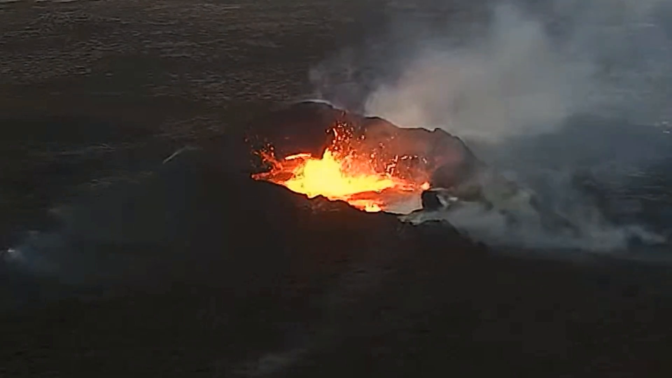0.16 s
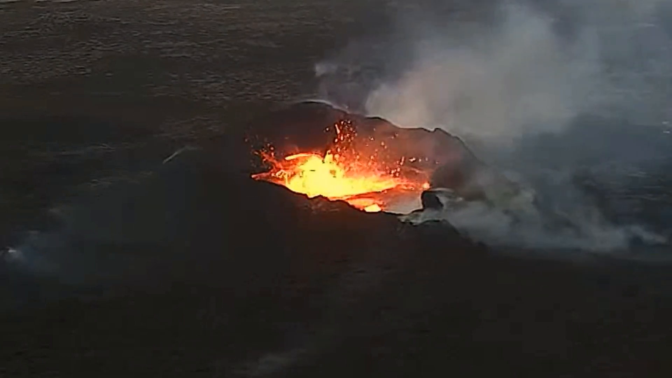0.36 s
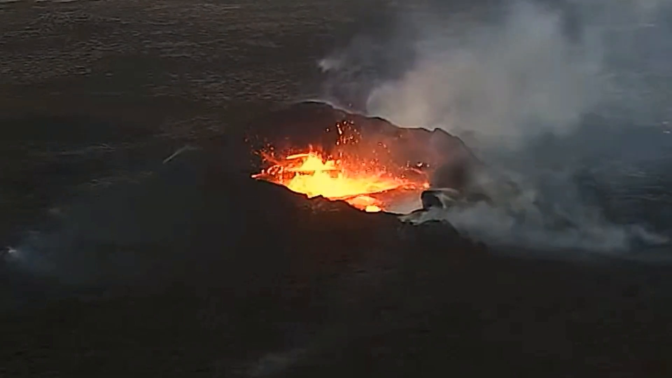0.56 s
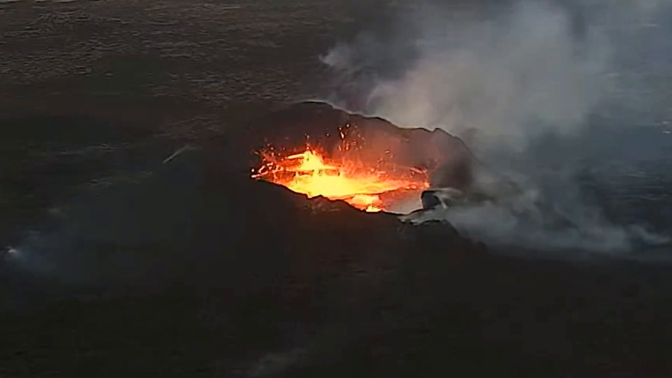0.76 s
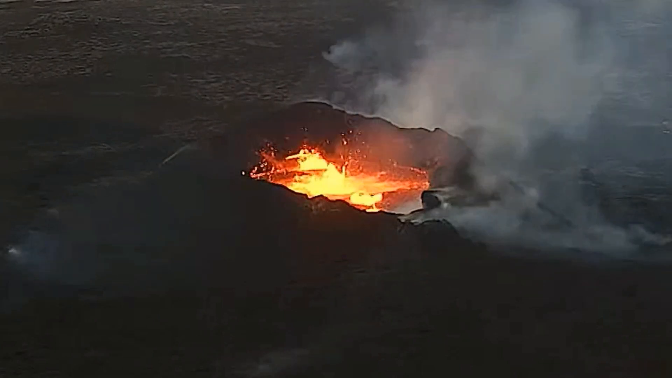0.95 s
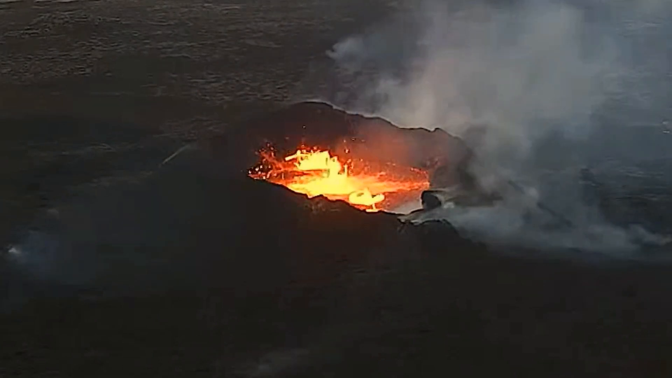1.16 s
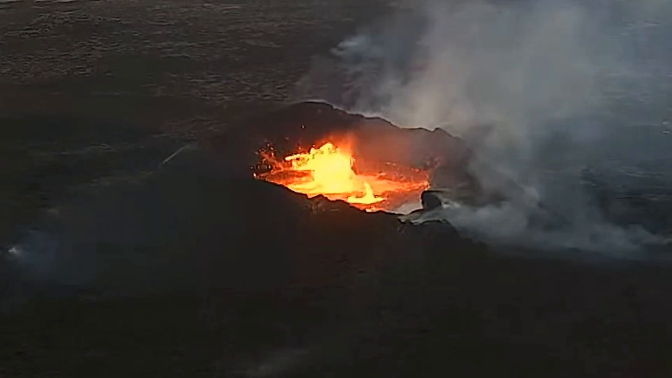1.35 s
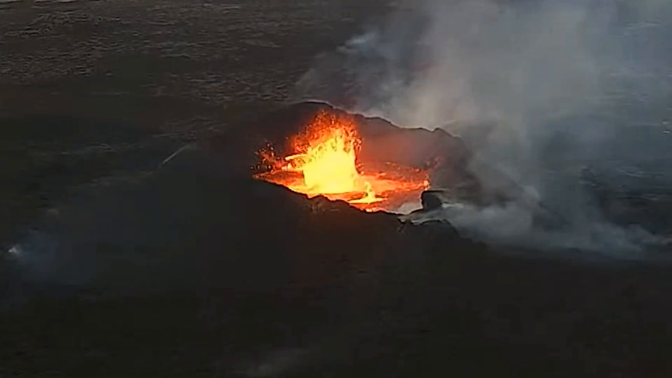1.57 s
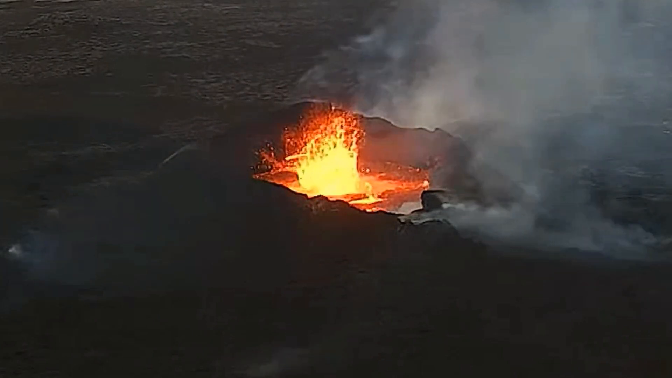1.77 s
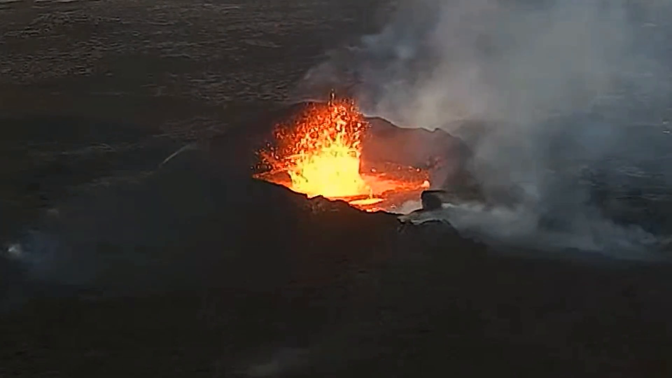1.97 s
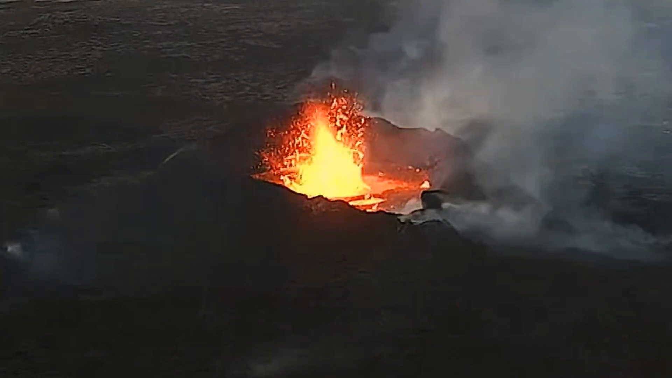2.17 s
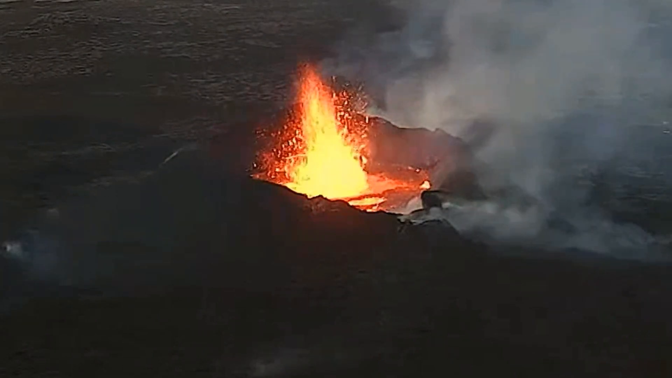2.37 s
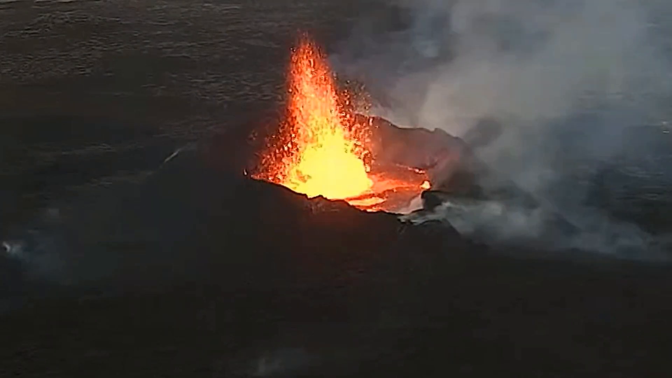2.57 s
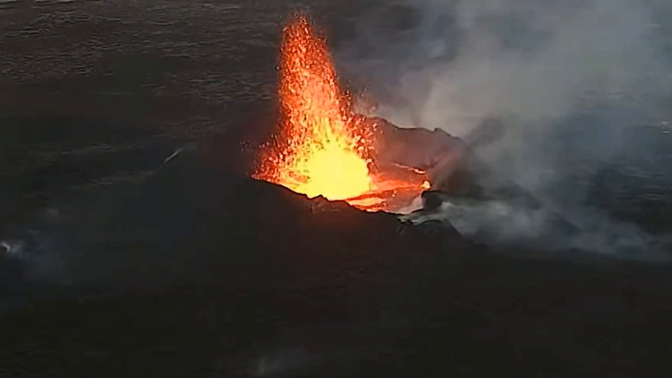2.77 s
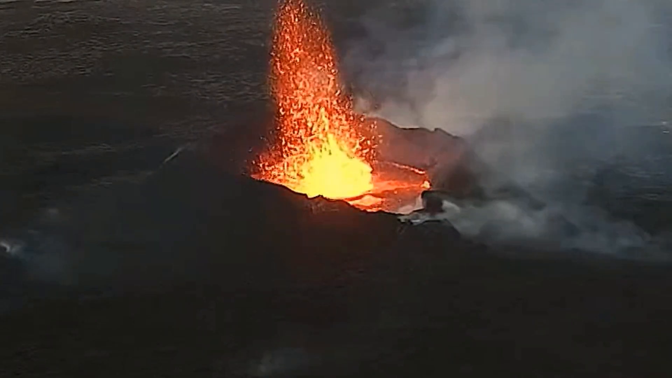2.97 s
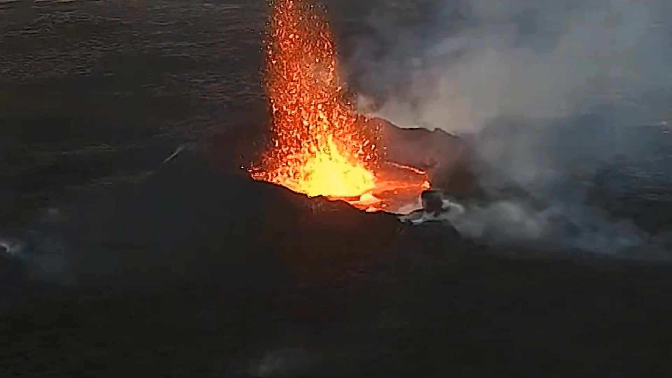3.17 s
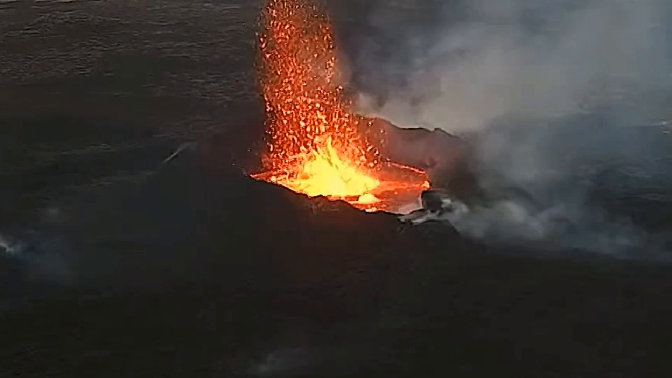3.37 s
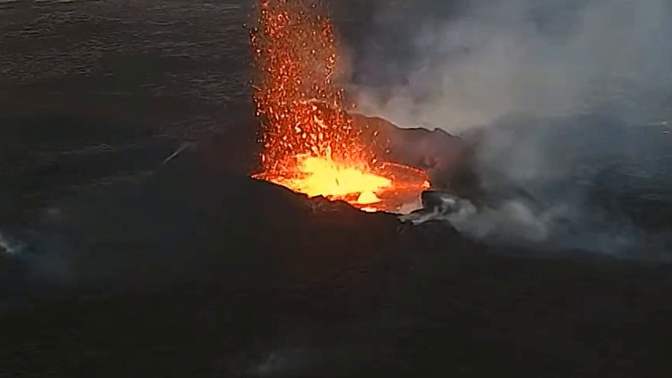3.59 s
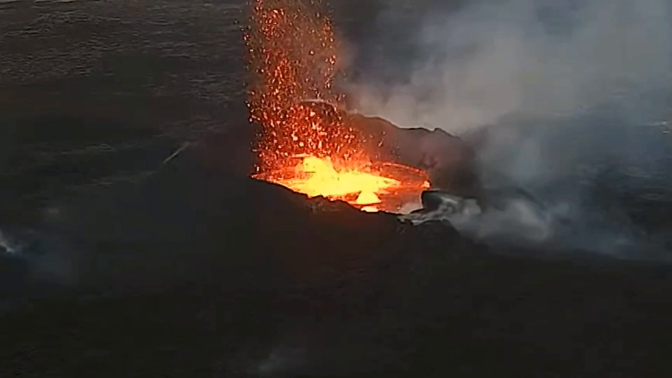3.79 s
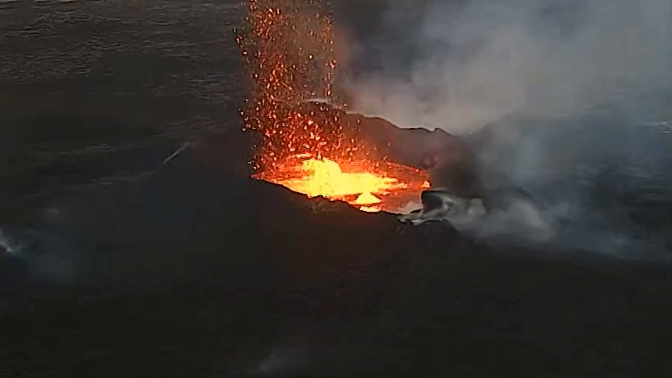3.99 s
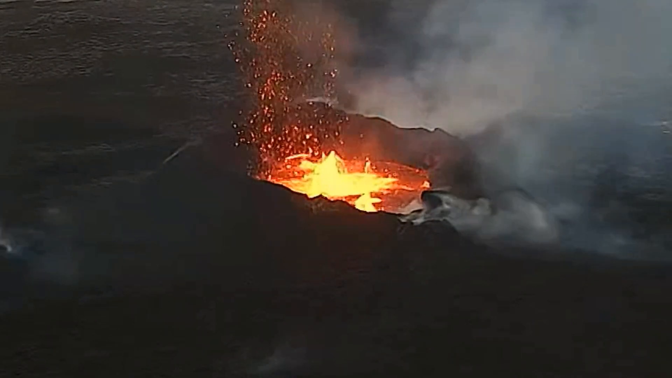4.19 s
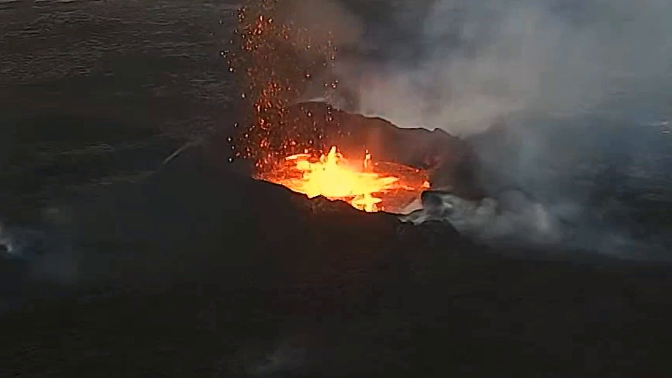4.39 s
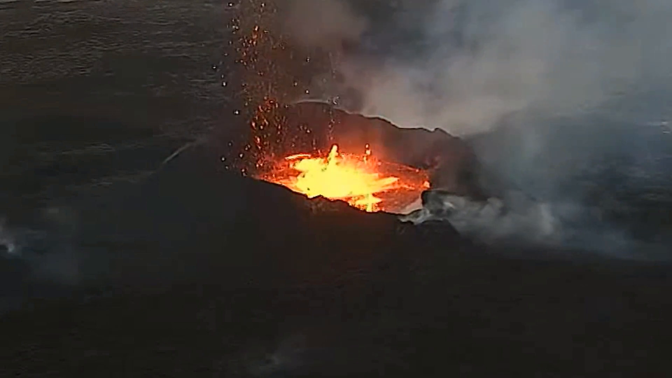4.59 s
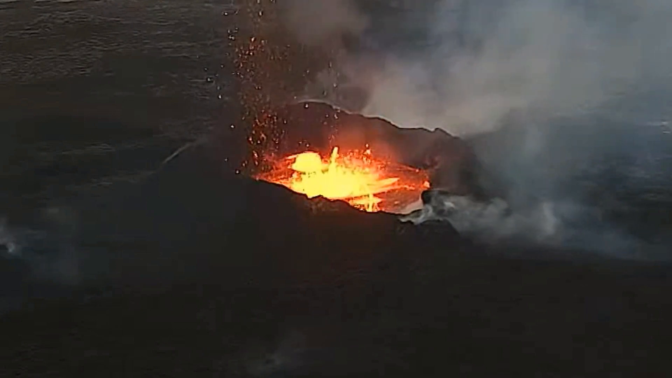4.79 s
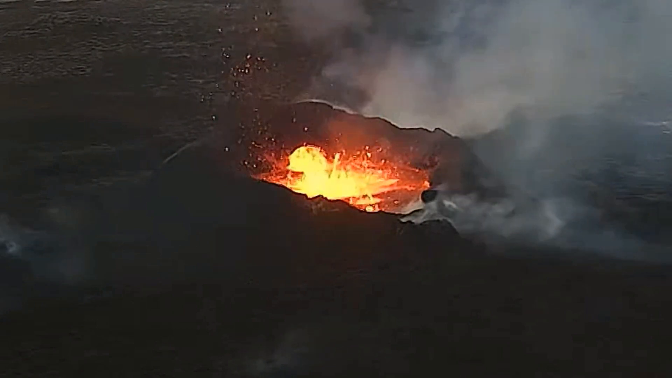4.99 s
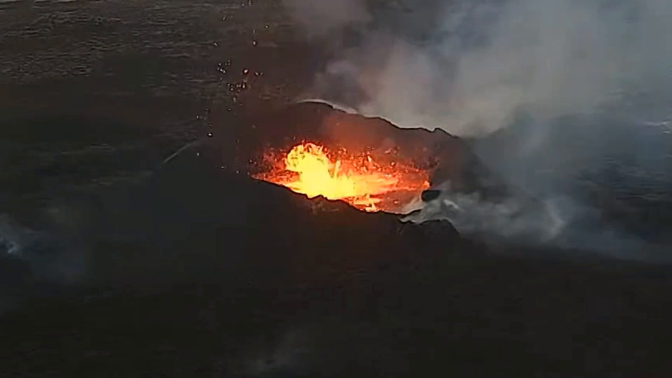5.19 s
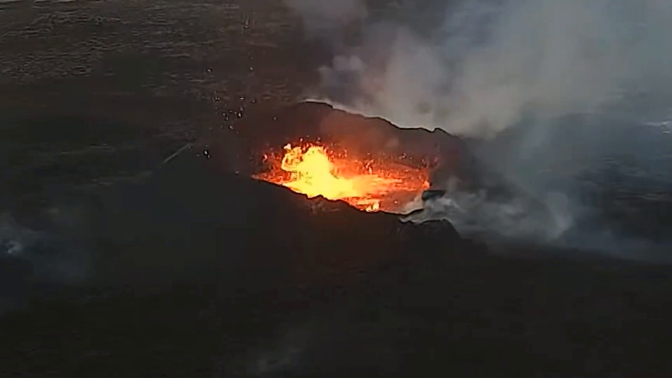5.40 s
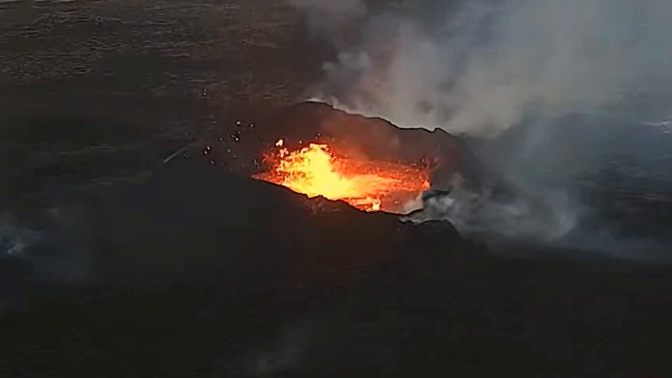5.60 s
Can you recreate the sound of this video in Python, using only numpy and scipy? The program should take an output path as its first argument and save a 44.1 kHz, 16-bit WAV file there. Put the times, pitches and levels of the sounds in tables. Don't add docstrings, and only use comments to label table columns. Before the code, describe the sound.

Outdoors, far from a lava crater: a dull churning roar and deep rumble run throughout. A breathy, fluttering whistle on the left and a lower howl sound in the first second. Around two seconds a fountain blows out with a bright, smooth gas rush while booming bubble bursts thicken. A weaker whistle and higher howl return after three seconds, echoing on the right. Heavy rumbling continues to the end. Wide, distant stereo microphone.

```python
import sys
import numpy as np
from scipy import signal
from scipy.fft import rfft, irfft, next_fast_len
from scipy.io import wavfile
from scipy.ndimage import uniform_filter1d

SR = 44100
rng = np.random.default_rng(int(sys.argv[2]) if len(sys.argv) > 2 else 0)


def unload_audio(sound):
    columns = np.transpose(np.atleast_2d(sound))
    steps = np.round(np.clip(columns, -1, 1) * 32767)
    wavfile.write(sys.argv[1], SR, steps.astype(np.int16))


def level_to_linear(level):
    exponent = np.asarray(level, float) / 20
    return 10 ** exponent


N = 249165


def lean(left_db):
    return level_to_linear(left_db / 2 * np.array([[1], [-1]]))


def rms_one(x):
    return x / np.sqrt(np.mean(x ** 2) + 1e-20)


def at_hz(points, hz):
    table_hz, value = np.transpose(points)
    return np.interp(np.log(hz), np.log(table_hz), value)


def drift(rate_hz):
    coarse = 40
    r = np.exp(-2 * np.pi * rate_hz * coarse / SR)
    steps = rng.standard_normal(N // coarse + 2002)
    slow = signal.lfilter([1], [1, -2 * r, r * r], steps)[2000:]
    return np.interp(np.arange(N) / coarse, np.arange(len(slow)), rms_one(slow))


def turbulence(colour, band_hz, left=((1, 0), (2, 0))):
    size = next_fast_len(N)
    hz = np.arange(size // 2 + 1) * SR / size + 1e-3
    inside = (hz > colour[0][0]) & (hz < colour[-1][0])
    shape = level_to_linear(at_hz(colour, hz)) * lean(at_hz(left, hz)) * inside
    counted = (hz > band_hz[0]) & (hz < band_hz[1])
    power = 2 * np.sum(np.mean(shape ** 2, axis=0)[counted]) / size
    white = rng.standard_normal((2, size))
    return irfft(rfft(white) * shape, size)[:, :N] / np.sqrt(power)


def evened(x, over_s, share):
    width = round(over_s * SR)
    power = uniform_filter1d(uniform_filter1d(x ** 2, width), width)
    return rms_one(x / (power + 1e-9) ** (share / 2)) * np.sqrt(np.mean(x ** 2))


def tilted(x, tilt_db, low_hz, high_hz):
    low = signal.sosfiltfilt(signal.butter(2, low_hz, fs=SR, output="sos"), x)
    high = signal.sosfiltfilt(signal.butter(2, high_hz, "high", fs=SR, output="sos"), x)
    high_gain = level_to_linear(tilt_db * np.array([[1.3], [.7]]))
    return x - low - high + level_to_linear(-tilt_db) * low + high_gain * high


def blow(puffs):
    shape = (0, 6), (0.71, 0), (1, 6)     # (share of the puff, dB below its peak)
    return [(s + at * length, hz + (at - .5) * glide, db - down)
            for s, length, hz, glide, db in puffs for at, down in shape]


def whistle(rows, width_hz, flutter, alike, left_db, skirt_hz, skirt_db):
    s, hz, level_db = np.transpose(rows)
    start, stop = round(s[0] * SR), round(s[-1] * SR)
    t = np.arange(start, stop) / SR
    pitch = uniform_filter1d(np.interp(t, s, hz), round(.012 * SR))
    tone_db = uniform_filter1d(np.interp(t, s, level_db), round(.012 * SR))

    parts = []     # (width Hz, centre Hz, level dB)
    for side, down_db in ((-1.6, 6), (.3, 1.5)):
        strand_hz = pitch * (1 + flutter * (side + .3 * drift(12)[:len(t)]))
        parts.append((width_hz, strand_hz, tone_db - down_db + 2.2 * drift(22)[:len(t)]))
    rush_db = uniform_filter1d(tone_db, round(.12 * SR)) + skirt_db
    parts.append((skirt_hz, pitch - .55 * skirt_hz, rush_db))

    out = np.zeros((2, N))
    fade = signal.windows.tukey(len(t), .1)
    for wide_hz, centre_hz, db in parts:
        white = rng.standard_normal((3, 2 * SR)) + 1j * rng.standard_normal((3, 2 * SR))
        low_pass = signal.butter(3, wide_hz / 2, fs=SR, output="sos")
        slow = signal.sosfilt(low_pass, white)[:, -len(t):]
        slow = slow / np.sqrt(np.mean(np.abs(slow) ** 2))
        ears = np.sqrt(alike) * slow[0] + np.sqrt(1 - alike) * slow[1:]
        carrier = np.exp(2j * np.pi * np.cumsum(centre_hz) / SR)
        out[:, start:stop] += level_to_linear(db) * np.sqrt(2) * (ears * carrier).real * fade
    return out * lean(left_db)


# (time [s], length [s], pitch [Hz], glide [Hz], level [dB])
HIGH_PUFFS = [
    [(0.0, 0.097, 1511, -15, -53), (.11, .14, 1629, 194, -49.5), (.255, .04, 1330, 103, -47),
     (.295, .085, 1723, 396, -45), (.38, 0.03, 1760, -40.5, -50), (.41, .055, 1754, 80, -44.5),
     (.465, 0.061, 1880, 59, -47.5), (.53, .07, 1627, -350, -46.5), (.62, .1, 1590, 147, -49),
     (.72, .08, 1700, 9, -49), (.82, 0.056, 1355, 23, -46), (.88, .035, 1380, -3, -50.5),
     (.915, .055, 1372, -38, -40)],
    [(3.18, 0.0698, 1795, 102.5, -55), (3.25, 0.0712, 2055, 347, -57.5), (3.325, .05, 1722, 120.5, -58),
     (3.375, 0.039, 2252, 264, -53), (3.415, 0.06, 2174, 120, -51), (3.48, .055, 2394, 59, -55.5),
     (3.535, .075, 2080, -250, -55), (3.62, .09, 2020, 41.5, -57.5), (3.71, 0.0493, 2108, 29, -59),
     (3.765, .05, 1708, -60, -57.5), (3.815, .07, 1664, 32, -58), (3.9, .18, 1760, -61, -64)],
    [(4.24, 0.1, 1497, -50, -58.5), (4.345, .115, 1450, -120, -56.5)],
]


def vent_whistle():
    return sum(whistle(blow(puffs), width_hz=123, flutter=.04, alike=.35, left_db=left_db,
                       skirt_hz=900, skirt_db=3.5)
               for puffs, left_db in zip(HIGH_PUFFS, (8, 7.5, 7.0)))


# (time [s], length [s], pitch [Hz], glide [Hz], level [dB])
LOW_PUFFS = [
    [(.45, .2, 709, 11, -47.5), (.66, 0.119, 752.5, 8, -46), (.79, 0.0697, 700, 0, -52),
     (.87, 0.12, 729, -20.5, -38.5), (.99, 0.078, 720, 21, -44), (1.08, 0.085, 742, -3, -40.5)],
    [(3.33, 0.22, 900, -27.5, -54.5), (3.66, 0.11, 930, 124, -44), (3.77, .08, 1020, 39.5, -48),
     (3.85, .08, 1070, -3.5, -44.5), (3.93, .075, 1010, -80, -44), (4.01, 0.0604, 920, 0, -47),
     (4.075, .07, 990, -110, -42.5), (4.16, 0.15, 845, -170, -45)],
]


def vent_howl():
    return sum(whistle(blow(puffs), width_hz=67, flutter=.035, alike=.096, left_db=left_db,
                       skirt_hz=311.5, skirt_db=-1.0)
               for puffs, left_db in zip(LOW_PUFFS, (0, 6.5)))


# (time [s], length [s], pitch [Hz], glide [Hz], level [dB])
WALL_PUFFS = [(3.44, .18, 900, 35.5, -52), (3.63, .115, 1055, -17.5, -44.5), (3.745, .1, 979, -32.5, -47),
              (3.91, .09, 990, -71, -41), (4.01, .05, 900, -1, -42), (4.09, .09, 962, -100, -49),
              (4.18, .1, 831, -120, -49)]


def wall_echo():
    return whistle(blow(WALL_PUFFS), width_hz=66, flutter=.02, alike=.07, left_db=-7.5,
                   skirt_hz=303.4, skirt_db=-1.5)


# (time [s], level [dB])
FOUNTAIN = [(0, -92.5), (1.0, -96), (1.27, -76), (1.6, -70), (1.9, -65), (2.15, -67), (2.4, -68),
            (2.7, -71), (3.0, -72), (3.4, -78), (4.1, -82.5), (5.65, -100)]
# (frequency [Hz], level [dB per Hz])
JET_COLOUR = [(200, 34.5), (300, 28), (600, 29.5), (1250, 20.5), (2000, 12), (2800, 11.5), (3600, 7),
              (4400, -0.5), (5300, 0), (6200, -11), (7400, -10), (8200, -21.5), (8700, -30), (9000, -46)]
# (frequency [Hz], left minus right [dB])
JET_LEFT = [(200, 0.5), (600, 8.5), (1400, 8.5), (2300, 5), (4000, 4), (8000, 0)]


def fountain():
    jet_db = np.interp(np.arange(N) / SR, *np.transpose(FOUNTAIN)) + 3
    return level_to_linear(jet_db + .6 * drift(8.3)) * turbulence(JET_COLOUR, (4300, 8000), JET_LEFT)


# (time [s], vigour [dB], depth of the gas source [dB])
VIGOUR = [(0, -39.5, 3), (.4, -39, -2), (1.1, -40.5, -4.5), (1.75, -37.5, -6.5), (1.92, -36, -3),
          (2.4, -35, 3), (2.9, -33.5, 2.5), (3.5, -33.5, 1.5), (3.95, -31, -2), (4.4, -34.5, -1),
          (5.0, -32, -10), (5.65, -35.5, -6)]


def eruption():
    t = np.arange(N) / SR
    s, vigour_db, depth_db = np.transpose(VIGOUR)
    full_db = -33
    return np.interp(t, s, vigour_db - full_db), np.interp(t, s, depth_db)


def layer_db(offset_db, by_vigour, by_depth):
    vigour, depth = eruption()
    return offset_db + 4.0 + by_vigour * vigour + by_depth * depth


# (frequency [Hz], level [dB per Hz])
ROAR_COLOUR = [(100, -5), (200, -1.5), (300, -3.5), (600, -8), (900, -12), (1250, -19.5), (2000, -30),
               (2400, -34), (3200, -37), (4400, -56.5), (5400, -60), (6200, -73), (7400, -76),
               (8600, -90.5)]
# (time [s], level [dB], brightness [dB], left minus right [dB])
HEAVE = [(0, 0.5, 0., 1), (.3, 0, 0.5, 0.), (.7, -.5, 1, -0.5), (1.1, 0., 0, 0.), (1.62, 0.5, 2, -0.5),
         (1.85, 1.5, 0., -1.5), (2.4, -0.5, 0., -0.5), (2.9, -0.5, -0.5, -1), (3.3, 0, 2, 0.),
         (3.8, -1, 2, 0), (4.15, 0, -0.5, -1), (4.4, 1, -1.5, 2), (4.65, 0, 0, 1), (4.85, .5, 0.5, 1.),
         (5.02, 0.5, -2, 1.), (5.25, -0.5, 0., -0.5), (5.45, -0.5, .5, 0.5), (5.65, 1.5, -2.5, 0.)]


def lake_roar():
    t = np.arange(N) / SR
    vigour, _ = eruption()
    jet = np.interp(t, *np.transpose(FOUNTAIN)) + 80
    s, *heave = np.transpose(HEAVE)
    heave_db, bright_db, left_db = (np.interp(t, s, column) for column in heave)
    level_db = layer_db(-37.5, by_vigour=.24, by_depth=.13) - 2.0 + heave_db + .051 * jet + .98 * drift(7.5)
    roar = level_to_linear(level_db) * lean(left_db) * turbulence(ROAR_COLOUR, (200, 1200))
    tilt_db = -.05 + bright_db - .62 * vigour - .06 * jet
    return tilted(roar, tilt_db, low_hz=400, high_hz=1670)


# (frequency [Hz], level [dB per Hz])
THROB_COLOUR = [(4, -14), (12, -2), (24, -5), (40, 0), (55, -14), (80, -40)]
BOOM_COLOUR = [(30, -23.5), (45, -8), (66, 0), (82, -3.5), (110, -24)]
RUMBLE_COLOUR = [(60, -27.5), (85, -3), (105, -2), (140, -6), (180, -9.5), (240, -16), (400, -29.5)]


def crater_shaking():
    throb = evened(turbulence(THROB_COLOUR, (20, 45)), over_s=.1, share=.7)
    boom = evened(turbulence(BOOM_COLOUR, (45, 85)), over_s=.08, share=.7)
    rumble = evened(turbulence(RUMBLE_COLOUR, (85, 200)), over_s=.06, share=.6)
    throb_db = layer_db(-39.5, by_vigour=.44, by_depth=1.7) - 1.5
    boom_db = layer_db(-36.5, by_vigour=.99, by_depth=.43)
    rumble_db = layer_db(-34.5, by_vigour=1.13, by_depth=.14)
    return level_to_linear(throb_db) * throb + level_to_linear(boom_db) * boom + level_to_linear(rumble_db) * rumble


def rings(bursts, cycles):
    t, out = np.arange(N) / SR, np.zeros((2, N))
    phases = rng.uniform(0, 2 * np.pi, (len(bursts), 2, 1))
    for (at, level_db, hz, left_db), phase in zip(bursts, phases):
        near = slice(max(0, round((at - .4) * SR)), round((at + .4) * SR))
        ears = lean(left_db)
        height = level_to_linear(3.5 + level_db) * ears / np.sqrt(np.mean(ears ** 2))
        swell = np.exp(-(2 * (t[near] - at) * hz / cycles) ** 2)
        out[:, near] += height * swell * np.sin(2 * np.pi * hz * t[near] + phase)
    return out


# (time [s], level [dB], pitch [Hz], left minus right [dB])
BIG_BURSTS = [(0.02, -46, 45, 6), (0.16, -39, 34.6, 1), (0.185, -33, 83.5, 9), (0.279, -35.1, 72.4, 9),
              (0.474, -38, 69.8, 12), (0.549, -32, 52.7, -8), (0.713, -45, 37.1, -6.5),
              (0.713, -36, 75.0, 3), (0.863, -40.5, 52.5, 2.9), (1.297, -48, 55.2, 10),
              (1.422, -39, 92.4, 2), (1.472, -52, 36.7, -12), (1.492, -48, 75, 3.0), (1.551, -47, 68, 3.8),
              (1.676, -35, 66.6, -11), (1.876, -31, 92.0, 7), (1.995, -49, 25.6, -5), (2.14, -50, 27.0, 0),
              (2.19, -26.5, 71.4, 3), (2.31, -36, 31.5, 5), (2.539, -25, 71.3, -2), (2.684, -28, 67.7, -16),
              (2.729, -28, 31.73, -11), (2.814, -28.5, 56, 5), (2.913, -47, 32.7, -0.2),
              (3.003, -27, 54.9, 1), (3.113, -42, 87.2, 3), (3.158, -43, 25.8, -3), (3.188, -38, 73.6, 9),
              (3.288, -31, 49.5, -14), (3.352, -33, 64.3, 3), (3.417, -36, 25.77, 4),
              (3.447, -23.5, 64.94, 0), (3.602, -28.5, 34.8, 18), (3.617, -34, 74.1, 1),
              (3.737, -33, 70.7, 8), (3.846, -36, 33.37, -4), (4.24, -42, 28.6, -6), (4.37, -29, 82.1, 3),
              (4.44, -44, 60.5, -3), (4.54, -27.5, 70.9, 2), (4.684, -35.5, 83, 6), (4.949, -28.5, 92.9, 7),
              (5.093, -47, 27.0, 4), (5.138, -26.5, 83.1, 4), (5.303, -29, 83.1, -12),
              (5.433, -26.5, 78.9, -3), (5.632, -25.5, 82.2, -9), (5.632, -58, 27.0, -4.1)]
SMALL_BURSTS = [(0.08, -38.5, 233, -4), (0.439, -36, 138.4, -0.7), (0.479, -35, 286, -7.8),
                (0.584, -39.5, 266, -17), (0.589, -30.5, 107.2, -2), (0.663, -38, 118.8, -10),
                (1.786, -30.5, 266, 0), (1.886, -28.5, 154.8, 6), (1.906, -30, 242.5, 4),
                (1.951, -26, 101.9, 9), (1.956, -37, 161.4, -5), (1.995, -37, 242, 9), (2.05, -46, 186, 3),
                (2.315, -37, 261.8, -1), (2.459, -37.5, 270.6, -5), (2.464, -26, 103, -3),
                (2.604, -37, 268, 1.5), (2.709, -36.5, 268, 9), (2.779, -32, 198.0, -1),
                (2.854, -31, 269, -12), (2.973, -33, 96.4, 4.5), (3.033, -39, 288, 8),
                (3.302, -26.5, 116.5, -15), (3.467, -33.5, 180, 0), (3.552, -33, 161.4, 6),
                (3.562, -33, 253, -1), (3.771, -34, 174, 2), (3.826, -31, 112.9, -1),
                (3.856, -25.5, 132.7, -1), (3.911, -31, 145.7, 7), (3.966, -24, 139, 0),
                (4.011, -32, 230.8, 8), (4.056, -30, 147.6, -5), (4.071, -29.5, 270, 2),
                (4.2, -24.5, 96.3, 1.5), (4.315, -34, 205.7, -4.7), (4.365, -25.5, 131, 1),
                (4.49, -33.5, 114.7, -3), (4.62, -28, 96.8, -11), (4.624, -30.5, 131.9, 2.5),
                (4.794, -32, 145.7, -8), (4.804, -37, 267.4, 10), (4.844, -32.5, 242.9, 10),
                (5.044, -27, 145, -4), (5.113, -32, 179.3, 1), (5.218, -46.5, 131.5, 0),
                (5.363, -30, 98, -8), (5.507, -24.5, 106.5, -6.5), (5.597, -36.5, 141.5, -13),
                (5.627, -31, 136, -12)]
MORE_BURSTS = [(1.89, -38, 170.6, 2), (1.97, -38, 213.8, 1.4), (2.1, -35, 268.0, 13), (2.17, -33, 107.4, 9),
               (2.18, -34.5, 297, 2), (2.28, -36.8, 152, 9), (2.29, -32.3, 96.4, 7), (2.31, -38, 269, -6),
               (2.43, -30, 68.6, -5), (2.45, -35, 240.3, 4.0), (2.47, -31, 121, 1), (2.61, -37, 299.3, 3),
               (2.7, -36.5, 300.0, -3.1), (2.77, -31, 98, -12.0), (2.97, -37, 86, 4.6),
               (3.08, -32.5, 123, 1), (3.09, -39, 268.0, -2.7), (3.1, -37.5, 172, -9.1),
               (3.18, -39, 122, 2), (3.25, -33, 189.3, 4), (3.27, -29, 136.1, 10), (3.36, -38, 124, 6),
               (3.46, -40.5, 239.3, -9), (3.61, -30, 77.2, 2.5), (3.68, -37, 121.5, 6),
               (3.78, -36, 137, 4.4), (3.93, -39, 85.6, -1), (3.98, -35, 189, 4), (3.99, -42, 268.0, -1),
               (4.01, -37, 108.6, 7), (4.07, -45, 241, 3.1), (4.18, -34, 172, 6), (4.18, -29, 69.1, 3.5),
               (4.26, -36.5, 121.3, 0.5), (4.33, -41, 263.6, 9), (4.48, -32.5, 109.2, -5),
               (4.55, -39.5, 152.4, 8), (4.63, -33.5, 135, 2.5), (5.02, -35.6, 196, 0.8),
               (5.1, -28, 108.6, -6), (5.19, -32, 123.5, -1), (5.38, -38, 191.0, -3.5),
               (5.39, -34, 107.7, -3), (5.48, -37, 108.6, -7.5), (5.59, -35, 154, -3)]
GROANS = [
    (.085, -32, 55, 14),
    (0.385, -42.5, 240, -1),
    (.97, -40.5, 70, 2.5),
    (.93, -46, 140, 4),
]


def bubbles():
    big, small = rings(BIG_BURSTS, cycles=3.5), rings(SMALL_BURSTS, cycles=4.85)
    more, groans = rings(MORE_BURSTS, cycles=5.5), rings(GROANS, cycles=15.0)
    return big + small + more + groans


def scene():
    vent = vent_whistle() + vent_howl() + wall_echo()
    return vent + fountain() + lake_roar() + crater_shaking() + bubbles()


def top_cut(x):
    return signal.sosfilt(signal.butter(12, 15400, fs=SR, output="sos"), x)


def record(dry):
    hiss = level_to_linear(-91.5) * rng.standard_normal(dry.shape)
    swing = -.08 * np.exp(-np.arange(N) / SR / .004) * np.array([[1], [0]])
    to_end = (N - np.arange(N)) / (.001 * SR)
    fade = np.sin(np.pi / 2 * np.clip(to_end, 0, 1)) ** 2
    return top_cut((dry + hiss + swing) * fade)


dry = scene()
out = record(dry)
unload_audio(out)
```